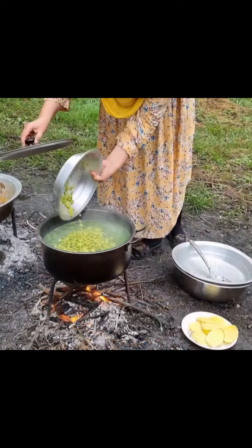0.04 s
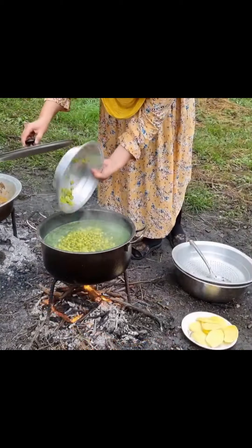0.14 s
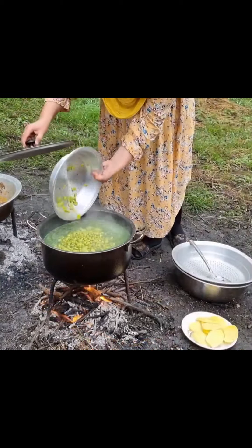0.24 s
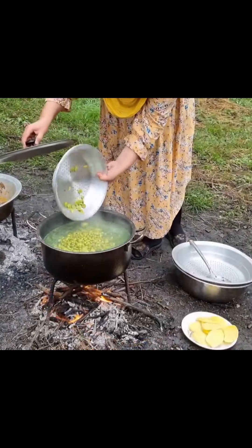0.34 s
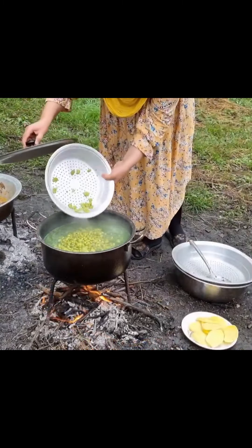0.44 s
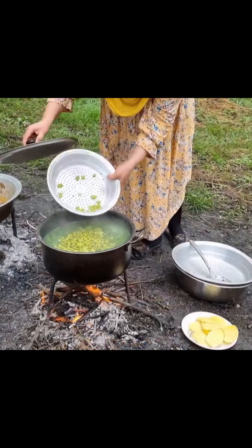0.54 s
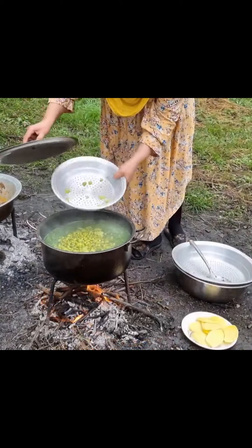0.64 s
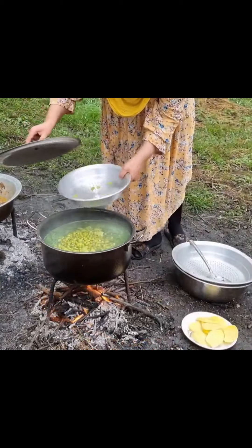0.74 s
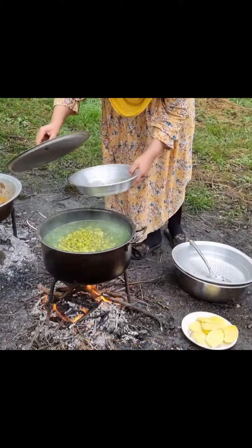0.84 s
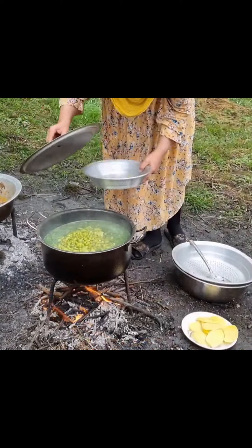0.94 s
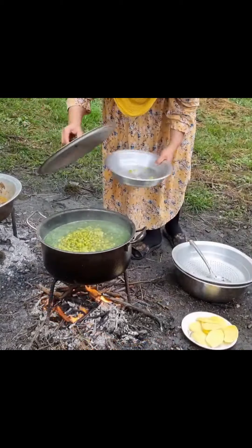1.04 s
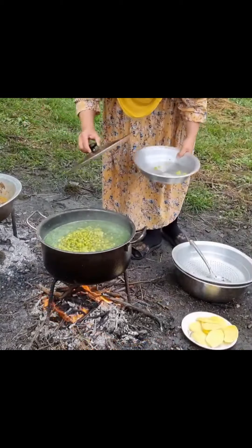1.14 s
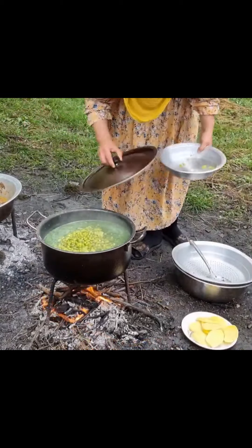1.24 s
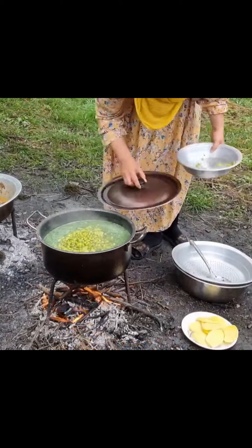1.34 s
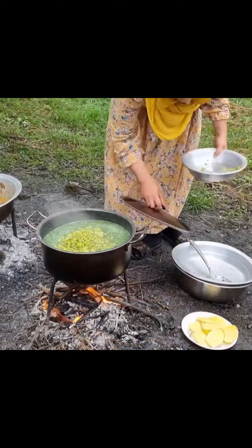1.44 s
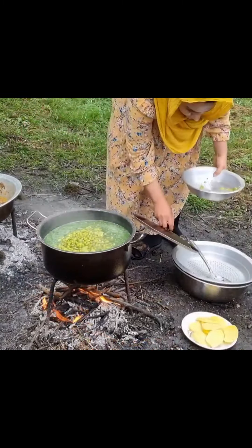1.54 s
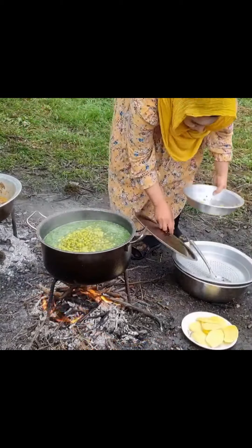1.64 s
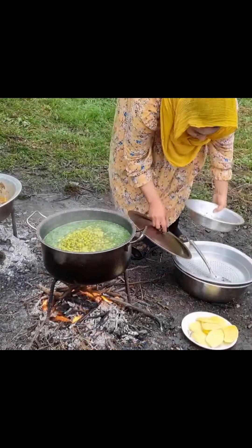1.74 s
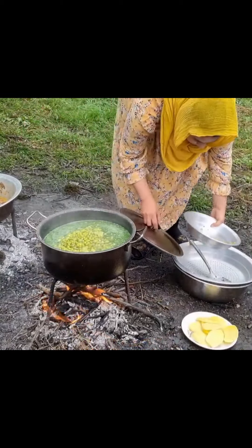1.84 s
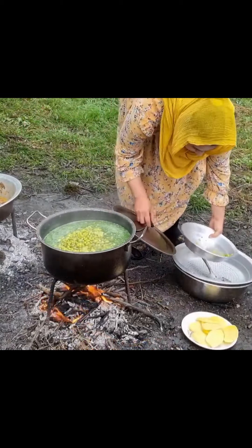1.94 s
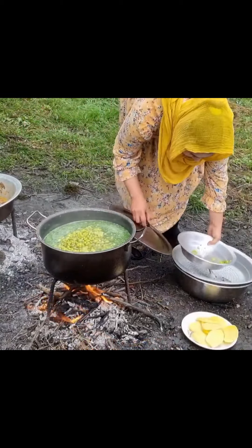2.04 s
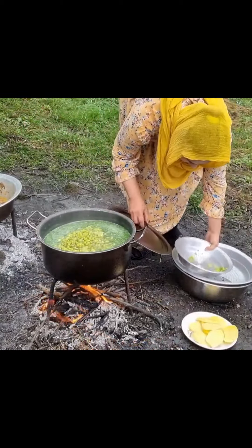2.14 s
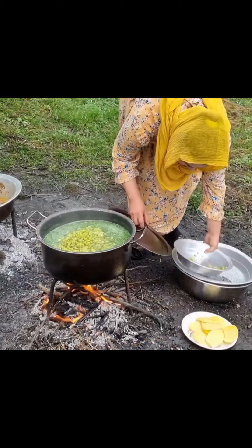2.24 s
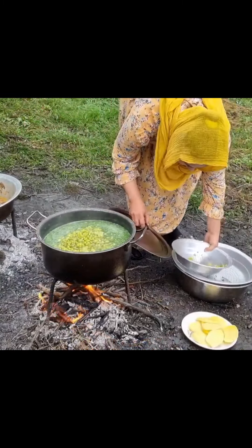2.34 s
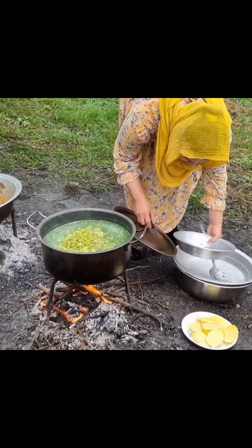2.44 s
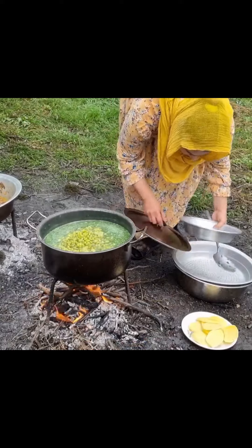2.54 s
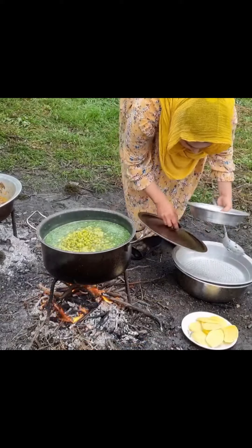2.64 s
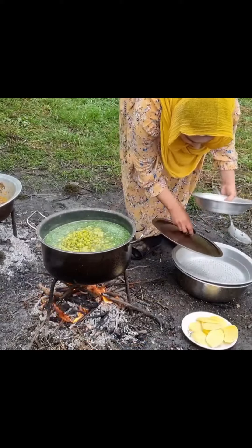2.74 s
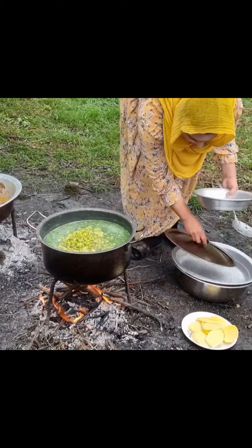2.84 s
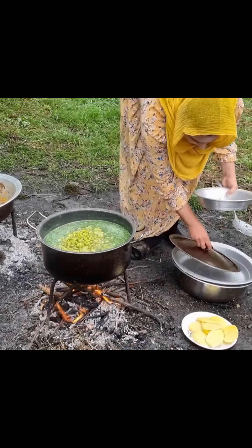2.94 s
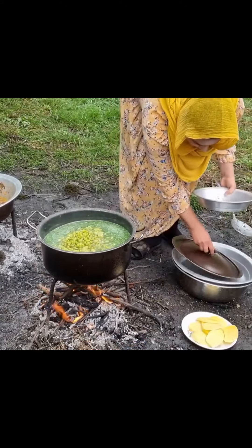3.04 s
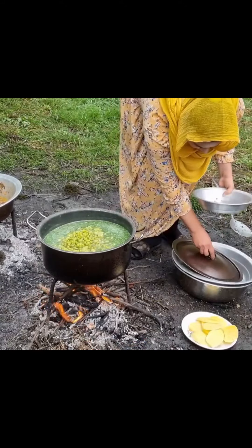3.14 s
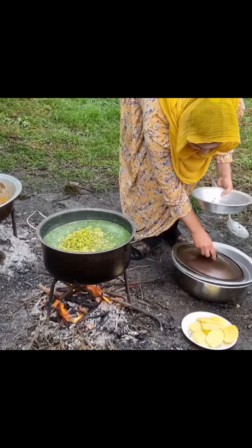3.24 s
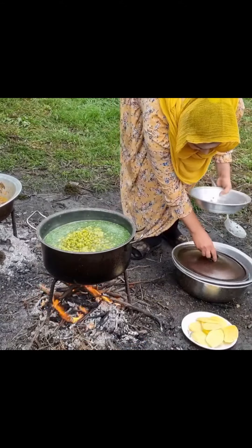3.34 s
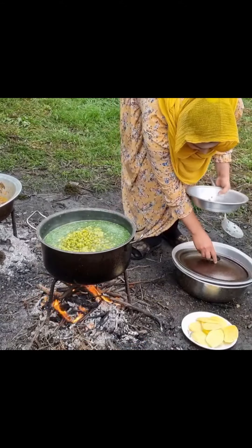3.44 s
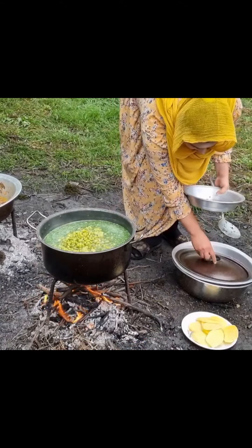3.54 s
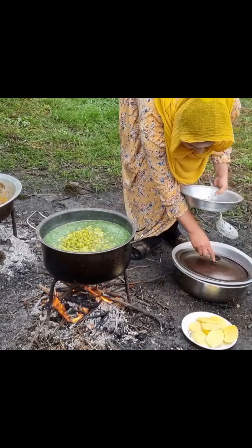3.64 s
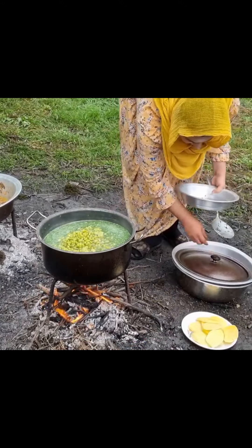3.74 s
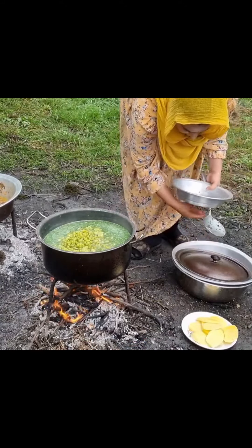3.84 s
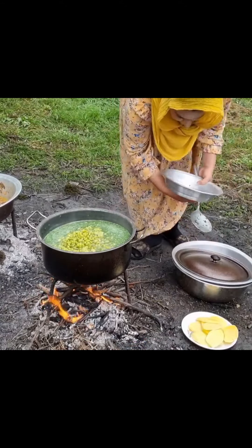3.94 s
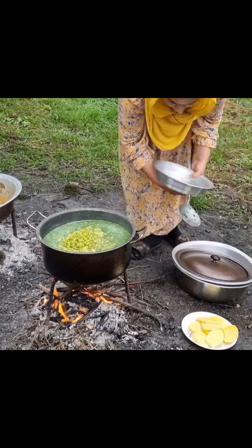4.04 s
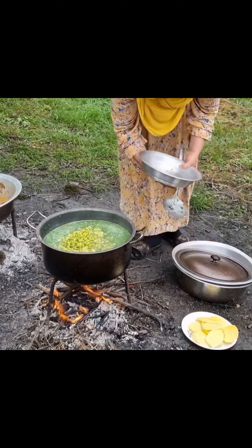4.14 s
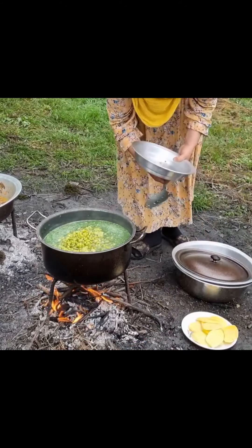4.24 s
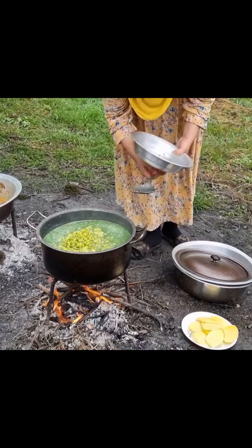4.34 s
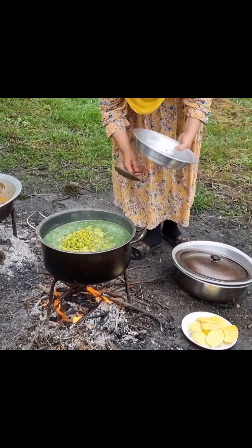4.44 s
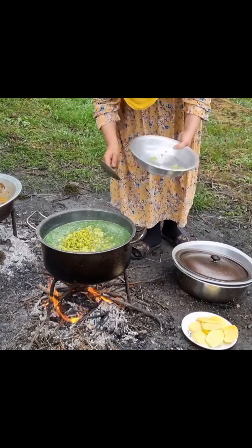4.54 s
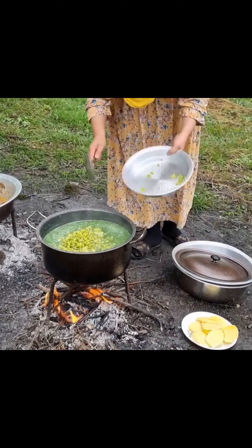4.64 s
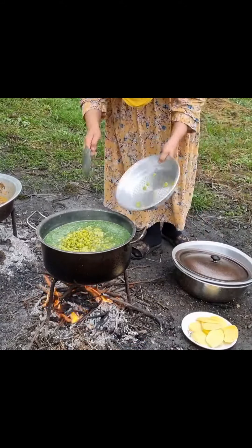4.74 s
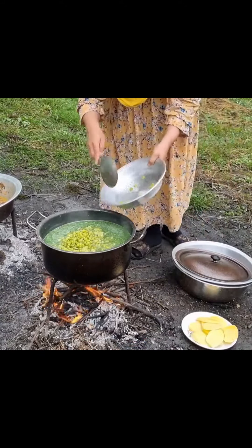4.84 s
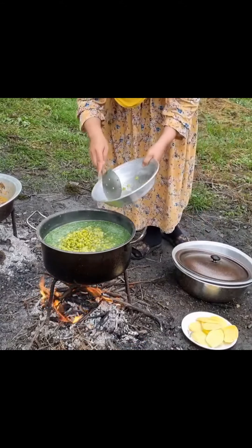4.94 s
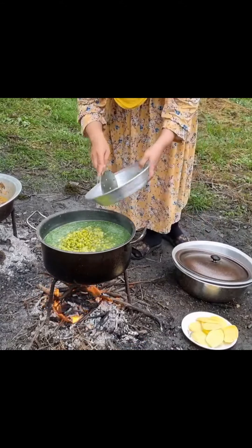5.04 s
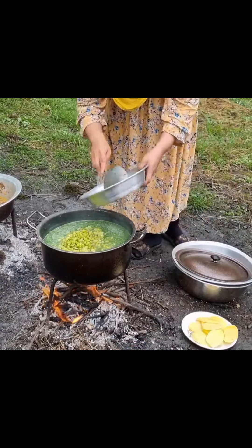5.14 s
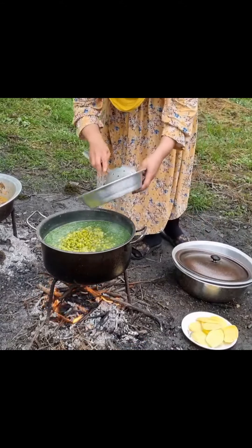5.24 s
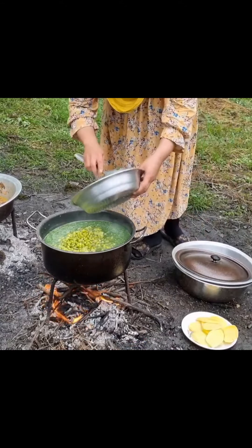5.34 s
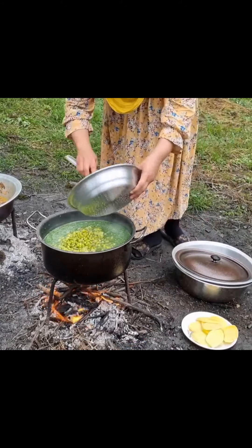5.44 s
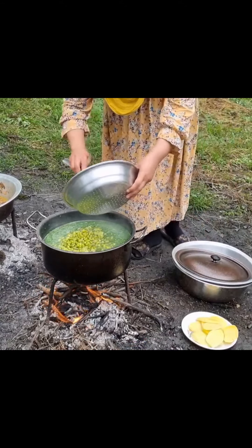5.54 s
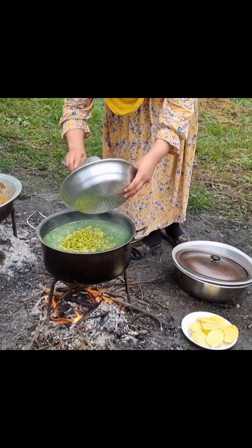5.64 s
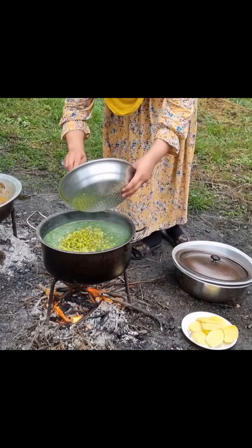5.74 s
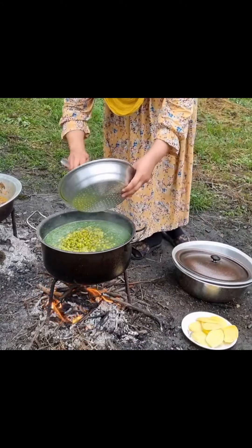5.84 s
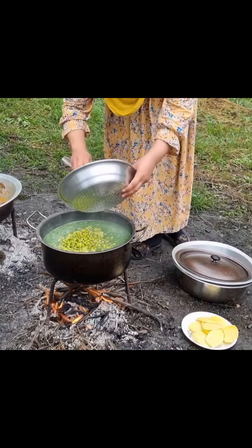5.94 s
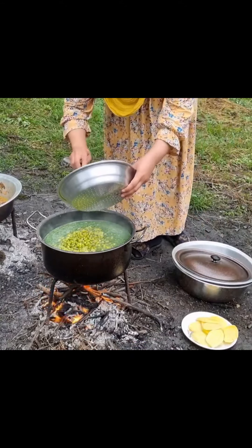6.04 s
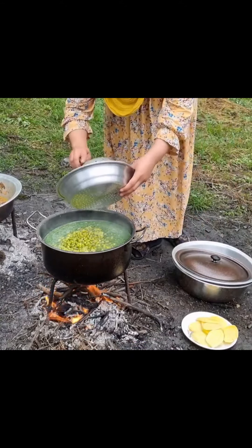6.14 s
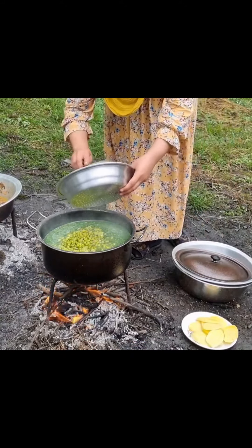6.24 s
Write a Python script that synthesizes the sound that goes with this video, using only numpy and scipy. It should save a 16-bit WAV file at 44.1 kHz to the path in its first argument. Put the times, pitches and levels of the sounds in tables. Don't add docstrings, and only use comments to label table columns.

```python
import sys
import numpy as np
from scipy import signal
from scipy.fft import rfft, irfft
from scipy.io import wavfile
from scipy.ndimage import uniform_filter1d, minimum_filter1d

SR = 44100
rng = np.random.default_rng(int(sys.argv[2]) if len(sys.argv) > 2 else 0)


def invert_db(level):
    return 10 ** (np.asarray(level, dtype=float) / 20)


def wav_record(signal):
    frames = np.transpose(np.atleast_2d(signal))
    bounded = np.clip(frames, -1, 1)
    quanta = np.round(bounded * 32767).astype(np.int16)
    wavfile.write(sys.argv[1], SR, quanta)


N = 278271

# t/s, level/dB
SIMMER = [(0.0, -0.5), (.6, 0), (1.1, -1.5), (1.4, 4.5), (2.1, -2), (2.85, 4), (3.6, 0.5), (4.0, -4),
          (4.4, -1.5), (4.7, 1.5), (5.0, 0), (5.6, 1.5), (6.3, 2.5)]
# f/Hz, width/Hz, level/dB
LID_MODES = [(246, 20, -6), (333, 18, 1), (560, 40, -10), (930, 30, -6), (1010, 45, -2), (1150, 40, -7),
             (1420, 40, -9), (1515, 30, -3), (1625, 30, -7), (2000, 80, -13), (2370, 40, -15),
             (2560, 60, -11), (2990, 35, -13), (4430, 70, -16), (5160, 45, -16), (5880, 90, -17),
             (7380, 90, -21), (9000, 47, -17)]
# f/Hz, density/(dB per Hz)
BASIN_HAZE = [(35, -53), (60, -38.5), (323, -10.5), (682, -18), (1580, -6), (1950, -10), (4030, -9),
              (4970, -6.5), (9130, -11), (16000, -28.5)]


def evened(x):
    return x / np.sqrt(np.mean(x ** 2) + 1e-20)


def read(points, hz):
    f, value = np.transpose(points)
    return np.interp(np.log(hz + 1), np.log(f + 1), value)


def add(mix, s, sound):
    part = mix[:, round(s * SR):][:, :sound.shape[-1]]
    part += sound[..., :part.shape[1]]


def modes(hz, db, t60, t, turn=0.88, scatter=0.81, lead=0):
    hz, db, t60 = (np.asarray(v) for v in (hz, db, t60))
    start = lead + 2 * np.pi * scatter * rng.random(hz.shape)
    apart = turn * np.log2(1 + hz / 900) * rng.standard_normal(hz.shape)
    phase = start + np.array([[-.5], [.5]]) * apart
    step = np.exp((2j * np.pi * hz - np.log(1000) / t60) / SR)
    spin = np.cumprod(np.repeat(step[:, None], len(t), axis=1), axis=1)
    return ((invert_db(db) * np.exp(1j * phase)) @ spin).imag


def field(colour_db, same, size, count, patchy_db):
    a, b, c, d, patches = rng.standard_normal((count, size // 2 + 1, 5)).T
    patches = uniform_filter1d(patches, size // 64, 0)
    patches = evened(uniform_filter1d(patches, 10, 1))
    left = a + 1j * b
    same = np.clip(same, -1, 1)[:, None]
    right = same * left + np.sqrt(1 - same ** 2) * (c + 1j * d)
    z = np.array([left, right]) * invert_db(colour_db + patchy_db * patches)
    return signal.istft(z, nperseg=size, noverlap=size * 3 // 4)[1]


def air():
    # f/Hz, density/(dB per Hz)
    air_colour = [(15, -49), (32, -27), (76, 6.5), (317, -8), (545, -10.5), (677, -23), (962, -17),
                  (1290, -21.5), (1400, -14.5), (2410, -18.5), (3520, -11.5), (8590, -19.5), (14000, -32.5),
                  (16000, -23.5)]
    # f/Hz, correlation
    likeness = [(60, 0.71), (180, 0.94), (550, 0.42), (1650, -0.57), (4970, 0.15), (15000, -0.96)]
    hz = np.fft.rfftfreq(1024, 1 / SR)
    t = (np.arange(N // 256 + 5) - 2) * 256 / SR
    simmer_db = np.interp(t, *np.transpose(SIMMER))
    hiss_share = np.clip(np.log2((hz[:, None] + 1) / 300) / 2.8, 0, 1)
    hiss_db = .9 * simmer_db + 3.5
    fire_db = 1.3 * simmer_db - 4.0
    drift_db = hiss_share * hiss_db + (1 - hiss_share) * fire_db
    flicker = evened(uniform_filter1d(rng.standard_normal(len(t)), size=2))
    flicker_db = (1.4 + 0.92 * hiss_share) * flicker
    colour_db = read(air_colour, hz)[:, None] + drift_db + flicker_db
    noise = field(colour_db, read(likeness, hz), size=1024, count=len(t), patchy_db=2.4)
    return invert_db(-52.5) * evened(noise[:, :N])


def grain(hz, cycles, glide, t):
    u = t * hz / cycles
    return np.sin(2 * np.pi * hz * t * (1 + glide * u)) * np.exp(-u) * (1 - np.exp(-6 * u))


def fizz(mix):
    t = np.arange(2000) / SR
    clump_db, clump_s = 7, .012
    flurry = invert_db(clump_db * evened(uniform_filter1d(rng.standard_normal(N), round(clump_s * SR))))
    foam = np.zeros((2, N))
    for hz in np.geomspace(2600, 7000, 16):
        bursts = rng.random(N) < 60 * flurry / SR
        size = invert_db(9.4 * np.minimum(rng.exponential(1, N), 3)) * bursts
        pops = signal.oaconvolve(size, grain(hz, rng.uniform(3, 16), .02, t))[:N]
        lean = rng.random()
        foam += [lean * pops, (1 - lean) * np.roll(pops, rng.integers(-8, 8))]
    simmer_db = np.interp(np.arange(N) / SR, *np.transpose(SIMMER))
    add(mix, 0, invert_db(-63.5 + simmer_db) * evened(foam))


def fire_spits(mix):
    # t/s, peak level/dB, f/Hz
    spit_events = [(0.052, -42.5, 4300), (0.0774, -37, 5760), (0.167, -44, 5760), (.202, -48, 5570),
                   (.262, -45, 5400), (.335, -46, 3900), (0.3574, -32.5, 4240), (0.4259, -51, 4700),
                   (0.5465, -32.5, 4400), (0.5684, -34, 6930), (0.7074, -39, 4600), (0.778, -35, 5360),
                   (0.8084, -41, 3400), (0.976, -43, 2960), (0.479, -49, 4300), (0.624, -37.5, 6100),
                   (.759, -49, 4300), (1.035, -50, 5250), (1.059, -51, 4800), (1.14, -41, 4200),
                   (1.165, -48, 4480), (4.92, -43, 2520), (3.617, -34, 6150), (3.622, -41, 8000),
                   (4.338, -43, 4000), (4.901, -53, 4360), (5.5957, -49, 4500), (5.945, -35, 5400),
                   (6.05, -41, 5200)]
    t = np.arange(2000) / SR
    for s, db, hz in spit_events:
        decay_s = .004 * invert_db(.5 * (db + 38))
        snap = rng.standard_normal((2, len(t))) * np.exp(-t / decay_s) * (1 - np.exp(-t / .0002))
        snap = signal.lfilter([1, -.25], 1, snap + snap[::-1] * .3)
        snap = snap * invert_db(.6 * (db + 50)) + grain(hz, 5.0, .02, t)
        add(mix, s, invert_db(db) * snap / abs(snap).max())


def broth_plops(mix):
    # t/s, peak level/dB, f/Hz
    plop_events = [
        (0.333, -45, 490),
        (0.542, -50, 385),
        (0.599, -54.5, 460),
        (1.08, -55.5, 253),
        (2.874, -47, 448),
    ]
    t = np.arange(2000) / SR
    for s, db, hz in plop_events:
        add(mix, s, invert_db(db) * grain(hz, 5.1, 0.028, t)[None])


def whistle(mix, s, hz, db):
    u = np.linspace(0, 1, len(hz))
    flutter_db = 3.3 * evened(uniform_filter1d(rng.standard_normal(len(u)), 120))
    swell_db = -14 * (u - 0.63) ** 2
    level = 1.8 * invert_db(db + swell_db + flutter_db) * signal.windows.tukey(len(u), .2)
    call = level * np.sin(2 * np.pi * np.cumsum(hz) / SR + np.array([[0], [1.2]]))
    echo = rng.standard_normal((2, 4000)) * invert_db(-33 - 60 * np.arange(4000) / SR / .16)
    add(mix, s, call)
    add(mix, s, signal.fftconvolve(call, echo, axes=1))


def birds(mix):
    # delay/s, length/s, end f/Hz, top f/Hz, share of the length at the top
    syllables = [
        (0.0, .046, 3865, 5860, 0.23),
        (0.074, 0.038, 3490, 4210, 0.74),
    ]
    # t/s, level/dB
    phrase_starts = [
        (.505, -44),
        (2.775, -47),
    ]
    # t/s, length/s, first f/Hz, last f/Hz, level/dB
    chirp_notes = [(.012, 0.037, 3150, 3540, -55), (0.869, 0.048, 3800, 3350, -59.5),
                   (1.127, 0.025, 2800, 3200, -58), (1.483, .02, 3130, 3450, -52),
                   (1.502, .015, 3480, 3100, -56), (2.592, 0.038, 3850, 3030, -54.5),
                   (2.625, 0.03, 4350, 2800, -49), (3.701, 0.02, 4950, 4400, -48.5),
                   (3.723, 0.015, 3650, 3610, -57), (3.74, 0.012, 2700, 2620, -56),
                   (3.728, 0.039, 4600, 4000, -56.5), (3.768, .02, 4300, 4020, -59),
                   (3.778, 0.041, 3500, 3300, -66), (3.833, 0.024, 3270, 3400, -60.5),
                   (3.914, 0.0091, 4600, 4110, -55.5), (3.927, 0.05, 4250, 4090, -59),
                   (3.933, 0.037, 3600, 3270, -58)]
    tiring_db_per_s = 60
    for s, db in phrase_starts:
        for delay, length, ends_hz, top_hz, share in syllables:
            arch = np.interp(np.linspace(0, 1, round(length * SR)), [0, share, 1], [0, 1, 0])
            path_hz = ends_hz + (top_hz - ends_hz) * uniform_filter1d(arch, size=200)
            whistle(mix, s + delay, path_hz, db - tiring_db_per_s * delay)
    for s, length, first_hz, last_hz, db in chirp_notes:
        whistle(mix, s, np.linspace(first_hz, last_hz, round(length * SR)), db)


def body(peaks, sheen, ring, place_db):
    # f/Hz, t60/s
    haze_t60 = [(200, 0.34), (1000, 0.11), (4000, 0.29), (12000, 0.032)]
    hz, width, db = np.transpose(peaks)
    t = np.arange(SR // 5) / SR
    mode_db = db + 20 * np.log10(width) + place_db * rng.standard_normal(len(hz))
    strong = modes(hz, mode_db, ring * 3.84 / width, t)
    bins = np.fft.rfftfreq(256, 1 / SR)
    lag = 64 * (np.arange(len(t) // 64 + 5) - 2) / SR
    fade_db = -60 * np.maximum(lag, 0) / (ring * read(haze_t60, bins))[:, None]
    same = read([(300, 1.0), (2000, 0.54), (9000, 0.073)], bins)
    haze = field(read(sheen, bins)[:, None] + fade_db, same, size=256, count=len(lag), patchy_db=2.0)
    return evened(strong), evened(haze[:, :len(t)])


def coloured(x, hard, weight):
    split_hz = (160, 700, 2500, 20000)
    total = 0
    for low, high, gain in zip(split_hz, split_hz[1:], (weight, -1, hard)):
        band = signal.sosfilt(signal.butter(2, (low, high), "band", fs=SR, output="sos"), x)
        total = total + gain * band / band.std()
    return total


def knock(mix, peaks, sheen, ring, sheen_db, s, db, hard_db, weight_db, contact):
    t = np.arange(SR // 10) / SR
    hold = max(contact, 1e-4)
    push = np.exp(-t / hold) * (1 - np.exp(-t / 0.0018))
    rattle = push * rng.standard_normal(len(t)) * invert_db(5.64 * rng.standard_normal(len(t)))
    strong, haze = body(peaks, sheen, ring, place_db=1.5)
    lag = np.arange(haze.shape[1]) / SR
    crack = haze * np.exp(-lag / .0025)
    haze = evened(signal.fftconvolve(rattle[None], haze, axes=1)[:, :len(lag)])
    rise = 1 - np.exp(-lag / max(0.31 * contact, 1e-4))
    sound = strong * rise + invert_db(sheen_db) * (haze + 1.23 * crack)
    sound = coloured(sound, invert_db(hard_db), invert_db(weight_db))
    choke = np.exp(-(lag / (3.5 * hold + 0.0047)) ** 2)
    sound = sound * (choke + invert_db(-6) * (1 - choke))
    sound = invert_db(db) * sound / abs(sound).max()
    add(mix, s - .0015, sound)
    graze = invert_db(-17) * sound[:, 200:460] * np.linspace(0, 1, 260)
    add(mix, s - .0075, graze)
    thud_hz = 85 * rng.uniform(.8, 1.3)
    thud = np.sin(2 * np.pi * thud_hz * t) * np.exp(-t / .022) * (1 - np.exp(-t / .005))
    add(mix, s, invert_db(0.53 * db - 36) * thud[None])


def slide(peaks, sheen, sheen_db, drag_db, grit_db, length, first_db, last_db, hard_db):
    lift_s, lift_db_per_s = 0.03, 507
    u = np.arange(0, length, 1 / SR)
    lift_db = lift_db_per_s * np.maximum(u - length + lift_s, 0)
    pressure = invert_db(np.linspace(first_db, last_db, len(u)) - lift_db)
    slips = rng.standard_normal(len(u))
    slips = slips * invert_db(grit_db * evened(uniform_filter1d(rng.standard_normal(len(u)), 130)))
    sound = 0
    for place in range(3):
        strong, haze = body(peaks, sheen, .6, place_db=1.5)
        haze = evened(haze * np.exp(-np.arange(haze.shape[1]) / SR / 0.011))
        force = pressure * slips * np.cos(np.pi * (5.8 * u + place / 3)) ** 2
        sound = sound + signal.fftconvolve(force[None], strong + invert_db(sheen_db) * haze, axes=1)
    level = np.linalg.norm(pressure) / np.sqrt(sound.shape[1])
    return level * coloured(sound, invert_db(hard_db), invert_db(drag_db))


def vessel(peaks, sheen, knocks, slides, ring, sheen_db, drag_db=0, grit_db=2.0):
    mix = np.zeros((2, N))
    for row in knocks:
        knock(mix, peaks, sheen, ring, sheen_db, *row)
    for s, *row in slides:
        add(mix, s, slide(peaks, sheen, sheen_db, drag_db, grit_db, *row))
    return mix


def rim_touches():
    # t/s, peak level/dB, hardness/dB, weight/dB, contact/s
    rim_knocks = [
        (4.104, -42.5, 18, -19, 0.002),
        (4.267, -36, 7, 3, 0.00086),
        (4.523, -19.5, 16, 0.5, 0.00095),
        (4.61, -38.5, 3, -28.5, 0.003),
    ]
    # t/s, length/s, first level/dB, last level/dB, hardness/dB
    rim_slides = [
        (4.11, 0.064, -63.5, -46, 0.008),
        (4.18, 0.11, -54.5, -46, 0),
    ]
    return vessel(LID_MODES, BASIN_HAZE, rim_knocks, rim_slides, ring=.15, sheen_db=3.0, drag_db=-20.0)


def basin_contacts():
    # f/Hz, width/Hz, level/dB
    basin_modes = [(340, 30, -1), (1230, 60, -6), (1630, 70, 0), (2040, 40, -3), (2290, 50, -5),
                   (2660, 60, 2), (2810, 40, 1), (3350, 110, -7), (4150, 130, -2), (4630, 40, -7),
                   (5310, 45, -6), (5920, 80, -9), (6240, 70, -8), (7290, 55, -9), (9040, 60, -11)]
    # t/s, peak level/dB, hardness/dB, weight/dB, contact/s
    basin_knocks = [
        (2.172, -7, -5.5, -9.5, 0.0043),
        (2.19, -15, -0.5, 3, 0.013),
        (2.219, -21, -2, -25, 0.0056),
        (2.343, -22, -13, -3.5, 0.0035),
        (2.349, -21, -8, 0, 0.0055),
        (2.394, -27.5, -13, -9, .004),
        (2.414, -24.5, 16.5, -18, 0.0024),
        (2.445, -5.5, 7, -15, 0.0019),
        (2.453, -10.5, 6.5, -15, 0.004),
    ]
    # t/s, length/s, first level/dB, last level/dB, hardness/dB
    basin_slides = [
        (2.2, 0.15, -30.5, -64.5, -2),
        (2.356, 0.1, -34, -41, -16.5),
        (2.475, 0.2, -39.5, -75.5, 1),
    ]
    return vessel(basin_modes, BASIN_HAZE, basin_knocks, basin_slides, ring=0.73, sheen_db=7.0, drag_db=-13.0)


def lid_contacts():
    # f/Hz, density/(dB per Hz)
    lid_haze = [(35, -57), (60, -47), (244, -3.5), (682, -45), (991, -14), (1510, -17), (3760, -29),
                (9130, -30), (14600, -42), (16000, -45.5)]
    # t/s, peak level/dB, hardness/dB, weight/dB, contact/s
    lid_knocks = [
        (2.979, -13, 8, 2, 0.0068),
        (3.039, -26, -18, 3, 0.037),
        (3.149, -10, -2, -3, 0.0031),
        (3.158, -12.5, 1, -3.5, 0.0039),
        (3.32, -17.5, -7.5, 0, 0.0066),
        (3.382, -19, 12, 7.5, 0.027),
        (3.419, -7.5, 9.5, -1.5, 0.0061),
        (3.434, -6, 4.5, -0.5, 0.0036),
        (3.449, -7.5, 3.5, -6, 0.0067),
        (2.999, -17, -1, -7.5, 0.0083),
    ]
    # t/s, length/s, first level/dB, last level/dB, hardness/dB
    lid_slides = [
        (3.0, 0.14, -27.5, -75, 0),
        (3.169, 0.17, -35, -53, -3.5),
        (3.34, 0.14, -39, -35, -0.5),
        (3.458, 0.14, -37, -82, 7),
    ]
    return vessel(LID_MODES, lid_haze, lid_knocks, lid_slides, ring=1.0, sheen_db=-4.5, drag_db=-3.0)


def held_strike():
    # f/Hz, width/Hz, level/dB
    held_modes = [(332, 150, 23), (604, 89.7, -7), (963, 67, 1), (1340, 150, -21.5), (4800, 130, -1),
                  (7030, 250, -23)]
    # f/Hz, density/(dB per Hz)
    held_haze = [(35, -61), (60, 7.5), (767, -19.5), (968, 3), (1310, -22.5), (2140, -30), (2350, -24),
                 (5800, -12.5), (8710, -17.5), (16000, -26)]
    # t/s, peak level/dB, hardness/dB, weight/dB, contact/s
    held_knocks = [
        (1.322, -4, 5, -5.5, 0.0023),
        (1.331, -15, 6.5, -11.5, 0.017),
    ]
    return vessel(held_modes, held_haze, held_knocks, [], ring=0.82, sheen_db=-5.5)


def ladle_scrape():
    # f/Hz, width/Hz, level/dB
    bowl_modes = [(400, 40, -13), (460, 40, -4), (555, 24, 0), (855, 50, -2), (1010, 50, -8),
                  (1620, 70, -7), (2170, 45, -4), (2480, 50, -7), (3060, 80, -10), (3360, 40, -8),
                  (4150, 90, -9), (4780, 70, -10), (5550, 55, -10), (6300, 70, -10), (7250, 100, -14),
                  (8400, 120, -14), (9090, 70, -13)]
    # f/Hz, density/(dB per Hz)
    bowl_haze = [(35, -36), (60, 10.5), (268, -31), (566, -8), (715, -35), (842, -8), (2140, -11),
                 (3670, -19), (8920, -13.5), (16000, -27)]
    # t/s, peak level/dB, hardness/dB, weight/dB, contact/s
    bowl_knocks = [(4.993, -20, 11.5, 1, 0.0015), (5.064, -11.5, 28, 1, 0.0014),
                   (5.082, -22.5, 4, 11, 0.0012), (5.255, -27.5, 5, -11, 0.01),
                   (5.325, -26.5, 5, -4, 0.0066), (5.345, -26, 7, -10, 0.0048),
                   (5.378, -34, -10, -9, 0.0044), (5.416, -26.5, 7, -28, 0.0027),
                   (5.712, -6, 11, 4.5, 0.0026), (5.722, -15, 8, 0, 0.0018), (5.755, -22, 2, -12, 0.0044),
                   (5.889, -19, 0, -20, 0.0066), (6.17, -18, 10, 12, 0.0092)]
    # t/s, length/s, first level/dB, last level/dB, hardness/dB
    bowl_slides = [
        (5.0, 0.04, -48, -52, 4),
        (5.028, 0.07, -47.5, -36, -0.5),
        (5.076, 0.11, -37.5, -43.5, 4),
        (5.17, 0.15, -45, -42.5, 5),
        (5.3, 0.091, -45.5, -37, 5.5),
        (5.395, 0.049, -53, -50.5, 7),
        (5.729, 0.075, -38.5, -31, 0),
        (5.781, 0.15, -37.5, -38.5, 6),
    ]
    return vessel(bowl_modes, bowl_haze, bowl_knocks, bowl_slides,
                  ring=.75, sheen_db=-4.0, drag_db=-8.0, grit_db=2.8)


def colander_ring(mix):
    # f/Hz, level/dB, t60/s
    free_modes = [(481, -13.5, 2.6), (485.3, -24, 1.5), (814.3, -39, .5), (926, -21.5, .29),
                  (963.5, -40, 2.4), (985.4, -16, .2), (1139, -17, .53), (1132.8, -15, .29),
                  (1269.6, -47, 4.0), (1263.6, -33, .62), (1475, -5, .25), (1487.5, -17, .39),
                  (1912, -16, .14), (2368.2, -40, 1.3), (2919.2, -23, .43), (2912, -60, 3.0),
                  (3204, -26, .1)]
    opposed_modes = [(817.9, -36, 1.8), (957.5, -42, .9), (1478.7, -18, .67)]
    crossed_modes = [(826.5, -38, .56), (993.7, -22, .45), (1154.3, -15, .45), (2361.4, -43, .9),
                     (2382, -21, .18), (2931.1, -22, .39), (2907.1, -36, .7), (2930.5, -49, 6.0)]
    beating_modes = [
        (1781.5, -25, 2.2),
        (1779.1, -41, 4.0),
        (1789.8, -22, 1.45),
        (1791.7, -32, 5.0),
    ]
    shimmer_modes = [(3456, 2, 0.13), (3688, -7, 0.091), (4300, -6, 0.2), (4834, -10.5, 0.29),
                     (5469, -9.5, 0.17), (5879, -7.5, 0.12), (6150, -19.5, 0.23), (6718, -19, 0.2),
                     (7127, -6.5, 0.098), (7311, -11.5, 0.16), (7736, -18, 0.19), (8080, -13.5, 0.15),
                     (8850, -5, 0.1), (8974, -19.5, 0.31)]
    strike_s, grip_s, down_s = 1.3225, 1.83, 2.55
    t = np.arange(3 * SR // 2) / SR
    gripped = np.maximum(t + strike_s - grip_s, 0)
    down_db = -100 * np.maximum(t + strike_s - down_s, 0)
    low_db = -11.0
    high_db = 4.0 - 40 * gripped
    groups = ((free_modes[:2], 0, low_db),
              (free_modes[2:], 0, high_db),
              (opposed_modes, np.pi, high_db),
              (crossed_modes, np.pi / 2, high_db),
              (beating_modes[:3], 0, -35 * gripped),
              (beating_modes[3:], np.pi / 2, -22 * gripped),
              (shimmer_modes, 0, -15))
    for group, lead, carry_db in groups:
        ring = modes(*np.transpose(group), t, turn=.4, scatter=0, lead=lead)
        add(mix, strike_s, invert_db(-9.5 + carry_db + down_db) * ring * (1 - np.exp(-t / 0.0031)))


def tinks(mix):
    # t/s, f/Hz, level/dB, t60/s
    tink_notes = [(2.444, 482, -53, .9), (2.445, 4130, -17, .06), (3.04, 333, -27, .25),
                  (4.334, 1389, -45, .09), (4.334, 1486, -49, .2), (4.73, 1385, -55, .08),
                  (3.665, 1487, -61, .3), (3.95, 1480, -63, .25), (3.425, 244, -13, .15),
                  (3.42, 1515, -17, .17), (3.158, 1015, -20, .06), (3.19, 1487, -34, .6),
                  (2.1715, 2730, -14, .07), (5.775, 570, -33, .12), (5.372, 560, -38, .14)]
    t = np.arange(SR // 2) / SR
    for s, hz, db, t60 in tink_notes:
        add(mix, s, modes([hz], [db], [t60], t, turn=.1) * (1 - np.exp(-t / 0.00087)))


def clangs(mix):
    # f/Hz, level/dB, t60/s
    clang_chords = [
        (2.1715, [(1296, -25.5, 0.094), (1615, -21, 0.14), (2053, -20.5, 0.07), (339.5, -29.5, 0.34)]),
        (2.345, [(333, -27, 0.086), (993, -39, 0.36)]),
        (2.445, [(235, -32, 0.069), (1002, -26, 0.13), (1545, -27, 0.13), (5319, -25, 0.057)]),
        (2.98, [(977, -24, 0.24), (1150, -27.5, 0.23), (1476, -27.5, 0.22), (338, -27, .2), (570, -30.5, .2)]),
        (3.149, [(993, -16.5, 0.1), (2476, -36, 0.2), (327.3, -30, 0.42)]),
        (3.319, [(1490, -30, .06), (2476, -24, .06), (248.7, -30, 0.43)]),
        (3.432, [(1007, -24.5, 0.16), (2570, -30, 0.079)]),
        (5.712, [(910, -23.5, 0.11), (2196, -17.5, 0.068)]),
        (6.171, [(539, -26.5, 0.11), (846, -39, 0.18)]),
    ]
    t = np.arange(SR // 4) / SR
    for s, notes in clang_chords:
        add(mix, s, modes(*np.transpose(notes), t, turn=0.44) * (1 - np.exp(-t / 0.0017)))


def scene():
    mix = air()
    fizz(mix)
    fire_spits(mix)
    broth_plops(mix)
    birds(mix)
    colander_ring(mix)
    tinks(mix)
    clangs(mix)
    basin = basin_contacts() + lid_contacts()
    mix += [np.roll(basin[0], shift=3), basin[1]]
    mix += rim_touches()
    mix += held_strike()
    return mix + ladle_scrape()


def thinned(x, weak_db=-7.0, cut_db=-12.0, rare=1.1):
    z = signal.stft(x, nperseg=2048, noverlap=1024)[2]
    power = abs(z) ** 2
    line = np.arange(z.shape[1])[:, None]
    weak = power < invert_db(2 * weak_db) * uniform_filter1d(power, 16, 1)
    luck = rng.standard_normal((z.shape[1] // 16 + 1, z.shape[2]))
    luck = np.repeat(luck, 16, 0)[:z.shape[1]]
    luck = evened(uniform_filter1d(luck, size=4, axis=1))
    lost = (luck > rare - 1.3 * (line > 700)) & (line > 150)
    lost = lost & (-minimum_filter1d(-power, 21, 1) < 9 * uniform_filter1d(power, 80, 1))
    gain = np.where(weak & (line > 90), invert_db(cut_db), 1) * np.where(lost, .01, 1)
    return signal.istft(z * gain, nperseg=2048, noverlap=1024)[1][:, :N]


def top_cut(x):
    return signal.sosfilt(signal.butter(12, 16470, fs=SR, output="sos"), x)


def record(dry):
    # f/Hz, left minus right level/dB
    port_tilt = [(60, 3), (300, 2), (1400, 2.5), (3100, 0.4), (6000, 0.4), (10000, -4.5), (15000, 1)]
    hz = np.fft.rfftfreq(N, 1 / SR)
    hiss = evened(np.diff(rng.standard_normal((2, N + 2)), n=2))
    dry = dry + invert_db(-62) * hiss
    tilt_db = read(port_tilt, hz) / 2
    edge_db = np.maximum(hz - 15300, 0) / 25
    ports = irfft(rfft(dry) * invert_db(np.array([tilt_db, -tilt_db]) - edge_db), N)
    mix = thinned(ports)
    return top_cut(mix)


dry = scene()
out = record(dry)
wav_record(out)
```